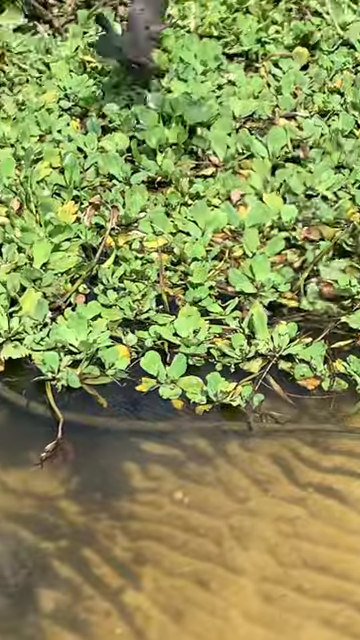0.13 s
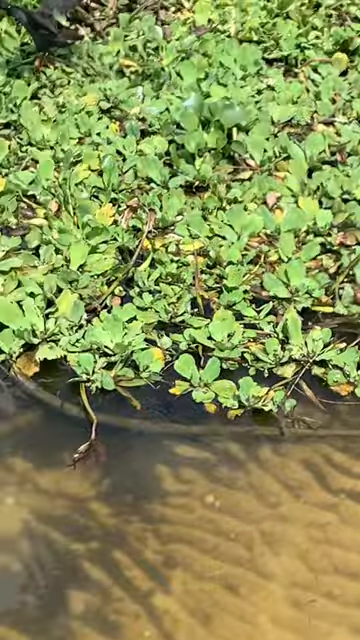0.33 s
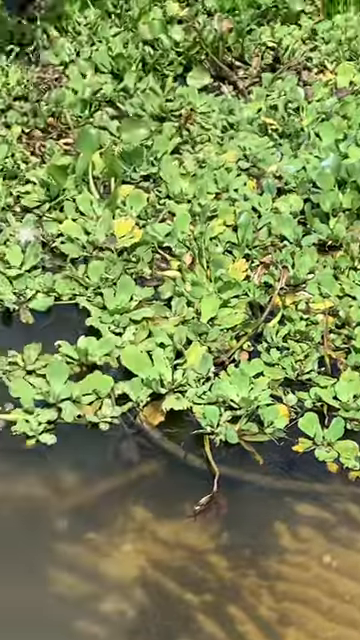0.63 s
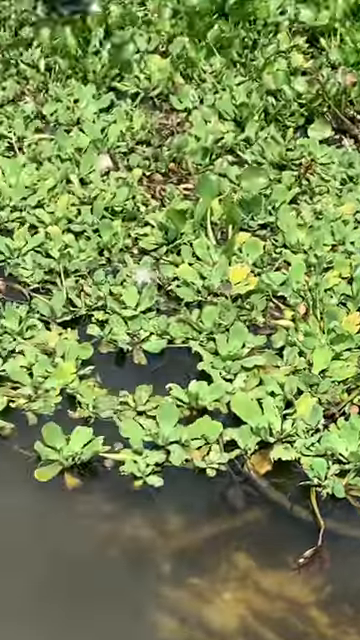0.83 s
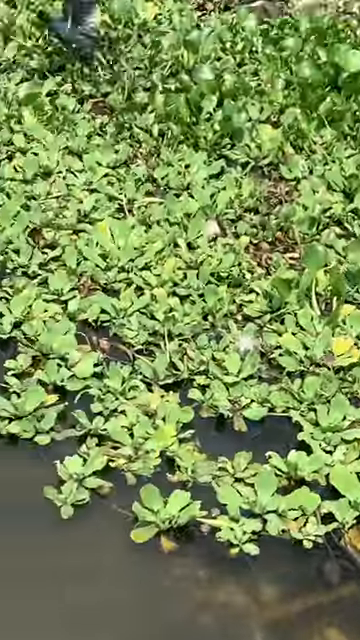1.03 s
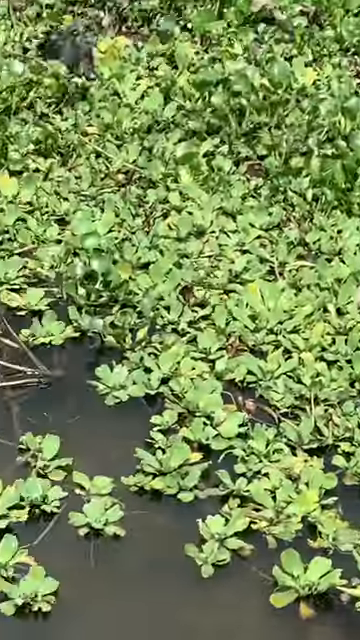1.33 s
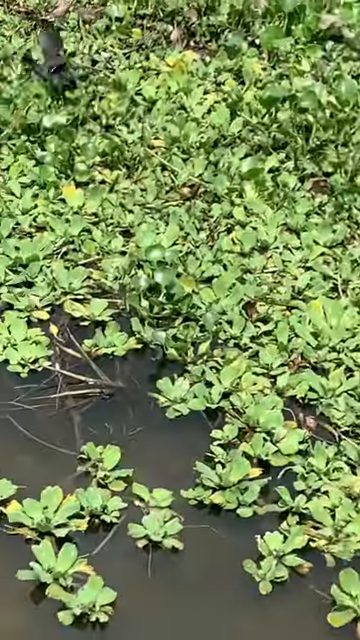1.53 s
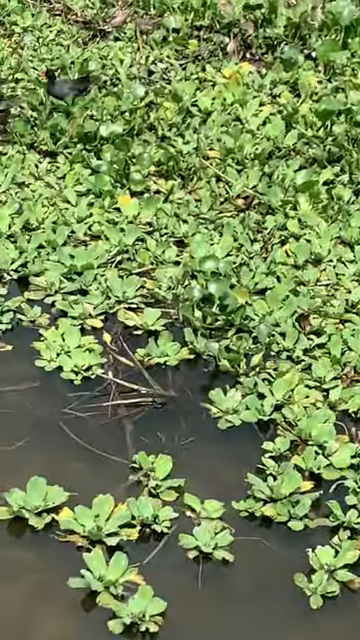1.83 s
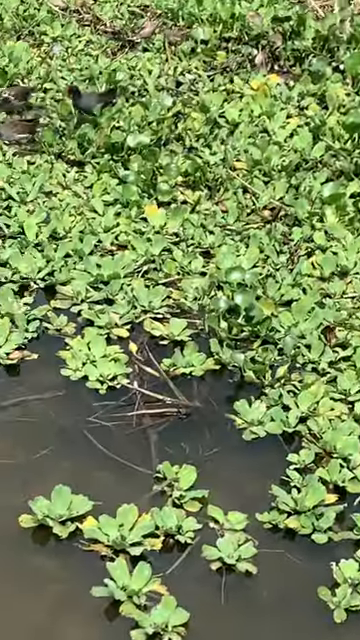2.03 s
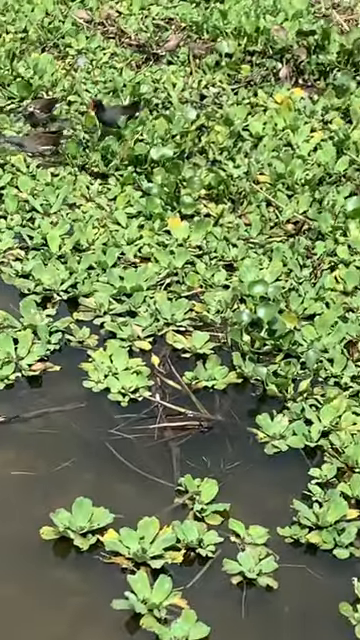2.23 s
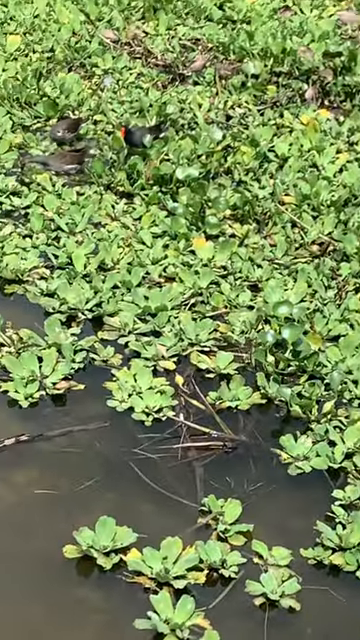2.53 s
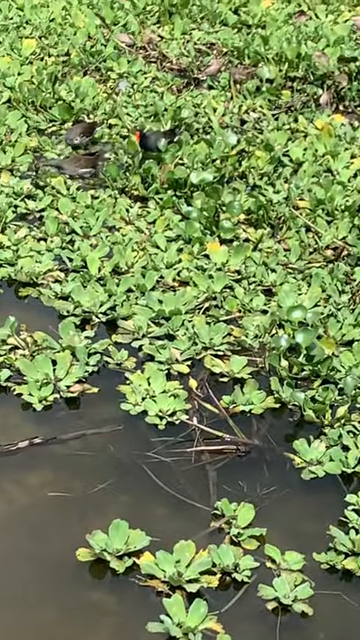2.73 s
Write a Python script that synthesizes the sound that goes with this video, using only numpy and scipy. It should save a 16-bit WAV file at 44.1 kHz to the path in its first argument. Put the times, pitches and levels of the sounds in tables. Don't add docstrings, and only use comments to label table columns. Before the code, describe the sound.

A moorhen close by gives two sharp clucks, then weaker ones, a grunt and a stuttered croak; wings brush floating leaves and stems snap, while a heavy vehicle rumbles low and wide behind the outdoor pond.

```python
import sys
import numpy as np
from scipy import signal
from scipy.fft import rfft, irfft, next_fast_len
from scipy.io import wavfile
from scipy.ndimage import uniform_filter1d, map_coordinates

SR = 44100
rng = np.random.default_rng(int(sys.argv[2]) if len(sys.argv) > 2 else 0)


def linear_from_db(decibels):
    return 10 ** (np.asarray(decibels, float) / 20)


def transcribe(signal):
    frames = np.atleast_2d(signal).T
    limited = np.clip(frames, -1, 1)
    pcm = np.round(limited * 32767).astype(np.int16)
    wavfile.write(sys.argv[1], SR, pcm)


N = 127890

# start_s, length_s, level_db, pitch_hz, share of pitch lost
FLYING_CLUCKS = [
    (0.085, 0.04, -19.5, 784, 0.33),
    (0.262, 0.04, -19, 767.4, 0.47),
]
TIRING_CLUCKS = [
    (.474, 0.038, -25, 712, 0.13),
    (.71, 0.055, -27.5, 724, 0.23),
    (1.189, 0.023, -32.5, 653, 0.1),
]
LANDED_CLUCKS = [
    (0.925, 0.051, -31.5, 715.6, .13),
    (1.417, 0.063, -27, 754.5, 0.19),
]
PIPS = [
    (.119, .01, -31, 770, 0),
    (.297, .011, -28, 790, 0),
    (.763, .011, -37, 700, 0),
    (1.18, .006, -40, 760, 0),
    (.675, .009, -37, 480, -.2),
    (.444, .005, -42, 620, 0),
    (.768, .016, -42, 640, -.1),
    (.512, .012, -39, 600, .05),
]
GRUNTS = [
    (1.864, 0.031, -31, 725, -0.058),
    (1.895, 0.013, -38, 620, -0.00072),
]
CROAKS = [(2.238, .02, -36, 1060, .04), (2.571, .005, -46, 660, 0), (2.58, .005, -43, 660, 0),
          (2.589, .007, -34, 660, 0), (2.599, .011, -32, 670, 0), (2.612, .011, -32, 670, 0),
          (2.627, .01, -33, 660, 0), (2.712, .005, -35, 720, 0), (2.72, .007, -41, 720, 0),
          (2.73, .006, -41, 720, 0), (2.738, .01, -32, 740, 0), (2.749, .01, -31, 730, 0),
          (2.759, .02, -28, 705, -.1), (2.78, .01, -30, 760, 0)]

# pitch_hz, level_db
NARROW_THROAT = [(750, -22.5), (1450, 0), (2250, -27.5), (3000, -23.5), (3900, -34.5), (7000, -51),
                 (14000, -59.5)]
HALF_OPEN_THROAT = [(700, -18.5), (1350, 3), (2150, -13), (2850, -12), (3600, -21), (4400, -27.5),
                    (7000, -42), (14000, -48.5)]
OPEN_THROAT = [(700, -10), (1400, 0.5), (2200, 0), (2900, -12), (3700, -7.5), (4400, -11.5), (6500, -30),
               (14000, -29.5)]
WIDE_THROAT = [(730, 5), (1400, -3), (2000, -14.5), (3000, 4.5), (3900, 7.5), (4700, 0.5), (6500, -16.5),
               (14000, -27)]
ROUND_THROAT = [(730, -2.5), (1500, -12), (2200, -2.5), (2950, 2), (3700, -3.5), (4400, -5), (5300, -17.5),
                (14000, -30.5)]
# pitch_hz, level_db per Hz
RASP = [(900, -17.5), (1300, -13), (1600, -8), (2000, -24.5), (4000, -23.5)]
# pitch_hz, level_db per Hz
HISS = [(600, -12.5), (1500, -8.5), (2700, -0.5), (3800, 1), (6000, -14)]

# centre_s, half_length_s, level_db
FLAPS = [(0.109, 0.074, -59), (0.286, 0.065, -44), (0.474, 0.087, -55.5), (0.747, 0.071, -46.5),
         (0.974, 0.094, -65.5), (1.142, 0.059, -53), (1.287, 0.22, -60), (1.442, 0.073, -51.5),
         (1.868, 0.052, -59), (2.6, 0.04, -55.5), (2.752, 0.052, -58)]
# pitch_hz, level_db per Hz
FEATHERS = [(1500, -8), (3800, 0), (5500, -4), (7800, 0), (16000, -8)]
# start_s, peak_db
SNAPS = [
    (0.444, -28),
    (0.651, -43.5),
    (1.0891, -23.5),
    (1.1277, -13.5),
    (1.53, -43),
    (2.051, -52.5),
]
# pitch_hz, level_db per Hz
STEM = [(1500, -11), (5000, -2), (8000, -10), (12500, -3), (16500, -7.5)]

# time_s, pitch_hz, level_db, octave_db
CHICK = [
    (2.138, 4000, -64, -85),
    (2.158, 4150, -59, -85),
    (2.165, 4700, -76, -76),
    (2.177, 5200, -58, -65),
    (2.195, 5900, -78, -67),
    (2.21, 6350, -67, -76),
    (2.226, 6300, -70, -90),
    (2.229, 5000, -70, -90),
    (2.238, 2700, -50, -90),
]
# start_s, end_s, level_db
TRILLS = [
    (.19, .345, -53),
    (.672, .689, -54),
    (.745, .81, -50),
    (1.115, 1.13, -47),
    (1.205, 1.41, -54),
]

# time_s, firing_hz, first_order_db, second_order_db
FIRING = [
    (.04, 56.33, -31.5, -28),
    (.5, 62.67, -31, -34),
    (1.05, 70.64, -28.5, -32),
    (1.55, 69.67, -29, -37.5),
    (2, 73.16, -25, -29.5),
    (2.4, 74.17, -28.5, -28.5),
    (2.9, 76.04, -27, -27),
]
# multiple of firing rate, level_db against the second order, unsteadiness_db
ORDERS = [(1.6, -6.5, -1), (3, -9.5, 4), (4, -18.5, 5.5)]
# pitch_hz, level_db per Hz
RUMBLE = [(30, -38.5), (50, 0), (90, -5.5), (125, 2), (190, -5), (250, -18), (320, -17.5), (450, -26.5)]
# pitch_hz, level_db per Hz
ROAD = [(300, 1), (500, 1), (800, 0.5), (1100, -7.5), (2200, -17.5), (4000, -19.5), (7000, -37.5),
        (16000, -44.5)]
# pitch_hz, level_db per Hz
BUZZ = [(14800, -2), (15500, -7.5), (15900, -10)]

# pitch_hz, lead_radians
LEAD = [(40, 0.2), (300, -0.9), (650, -1.73), (1000, -1.5), (1300, 0.64), (2300, 0.77), (3000, 1.45),
        (3900, 2.32)]
# pitch_hz, left_over_right_db
LEFT_DB = [(40, 0), (220, 4.5), (450, 3.5), (600, 0), (2000, -4.5), (3300, -1.5)]
# pitch_hz, unrelated share
LOOSE = [(60, .08), (250, 0.094), (500, 0.23), (1500, 0.67), (3500, 0.4), (4200, 0.028), (16000, 0.03)]

RUMBLE_DB, ROAD_DB = -28.5, -44
LEAD_TOP_HZ = 3900
TOP_HZ = 15950
T = np.arange(N) / SR


def unit(x):
    return x / np.sqrt(np.mean(x ** 2) + 1e-20)


def along(points, hz):
    f, v = np.transpose(points)
    return np.interp(np.log(hz + 1), np.log(f + 1), v)


def curves(rows):
    s, *cols = np.transpose(rows)
    return [np.interp(T, s, c) for c in cols]


def wobble(rate_hz):
    return map_coordinates(rng.standard_normal(int(N * rate_hz / SR) + 4), [np.arange(N) * rate_hz / SR])


def filtered(x, response):
    m = next_fast_len(N + 8192)
    return irfft(rfft(x, m) * response(np.fft.rfftfreq(m, 1 / SR)), m)[..., :N]


def noise(spectrum):
    closed = [(spectrum[0][0] / 2, -90), *spectrum, (spectrum[-1][0] * 2, -90)]
    return unit(filtered(rng.standard_normal(N), lambda hz: linear_from_db(along(closed, hz))))


def voice(calls, throat, attack_s, release, bend, rough, flutter_db):
    out, breath = np.zeros(N), noise(throat)
    shake, blur = wobble(250), wobble(500)
    k = np.arange(1, 23)[:, None]
    wander = 0.025 * np.clip(k - 3, 1, 8)
    for start_s, length_s, db, hz, sag in calls:
        i = round(start_s * SR) + np.arange(round(length_s * SR))
        u = np.linspace(0, 1, len(i))
        pitch = hz * (1 - sag * u ** bend) * (1 + 0.07 * rough * shake[i])
        turn = 2 * np.pi * np.cumsum(pitch) / SR
        overtone_hz = k * pitch

        knots = rng.standard_normal((len(k), 8))
        flutter = np.array([np.interp(u * length_s * 110, np.arange(8), row) for row in knots])
        flutter = flutter * np.clip((k - 1.5) / 1.5, .3, 3)
        beak_db = 11 * np.exp(-((overtone_hz - 9470) / 1700) ** 2)
        tired_db = 3 * np.clip(k - 2, 0, 5) * u ** 2 * abs(sag) / 0.24
        level_db = along(throat, overtone_hz) + beak_db - tired_db + flutter_db * flutter

        waves = np.sin(k * (turn + wander * blur[i]) + knots[:, -1:])
        stack = unit((linear_from_db(level_db) * (overtone_hz < TOP_HZ) * waves).sum(0))
        attack = np.clip(u * length_s / attack_s, 0, 1)
        shape = attack * np.clip((1 - u) / release, 0, 1) * linear_from_db(-4.5 * u)
        out[i] += linear_from_db(db) * shape * (stack + rough * breath[i] * (1 + np.cos(turn)))
    return out


def moorhen_breath():
    wrap = np.zeros(N)
    for start_s, length_s, db, _, _ in FLYING_CLUCKS + TIRING_CLUCKS + LANDED_CLUCKS:
        before = np.exp(-((start_s - T) / .03) ** 2)
        after = np.exp(-((T - start_s - length_s) / .012) ** 2)
        wrap += linear_from_db(db) * (before + after)
    rasp = linear_from_db(-19.5 + 2.5 * wobble(90)) * wrap * noise(RASP)
    gate = np.clip((T - 1.823) / 0.015, 0, 1) * (T < GRUNTS[1][0])
    return rasp + linear_from_db(-46 + 1.6 * wobble(130)) * gate * noise(HISS)


def moorhens():
    flying = voice(FLYING_CLUCKS, NARROW_THROAT, .0053, .14, 5.5, .06, flutter_db=2)
    tiring = voice(TIRING_CLUCKS, HALF_OPEN_THROAT, .0032, .14, 3.4, .06, flutter_db=2)
    landed = voice(LANDED_CLUCKS, OPEN_THROAT, .0033, .14, 1.6, .06, flutter_db=2)
    pips = voice(PIPS, NARROW_THROAT, 0.00091, 0.22, 0.53, 0.41, flutter_db=5.5)
    croaks = linear_from_db(1.5) * voice(CROAKS, WIDE_THROAT, 0.0022, 0.29, 1.0, 0.4, flutter_db=-0.5)
    grunts = voice(GRUNTS, ROUND_THROAT, .003, 0.22, 1.4, 0.29, flutter_db=1.2)
    return flying + tiring + landed + pips + croaks + grunts + moorhen_breath()


def leaves():
    swell = sum(linear_from_db(db) * np.exp(-((T - s) / half_s) ** 2) for s, half_s, db in FLAPS)
    snaps = np.zeros(N)
    for start_s, peak_db in SNAPS:
        fade_db = 60 * np.maximum(T - start_s, 0) / 0.0093
        snaps += linear_from_db(peak_db - fade_db) * np.clip((T - start_s) / 0.00041, 0, 1)
    return swell * linear_from_db(1.53 * wobble(120)) * noise(FEATHERS) + 0.44 * snaps * noise(STEM)


def chick():
    pitch, level_db, octave_db = curves(CHICK)
    turn = 2 * np.pi * np.cumsum(pitch) / SR
    on = (T > CHICK[0][0]) & (T < CHICK[-1][0])
    note = linear_from_db(level_db + 4 * wobble(120)) * np.sin(turn)
    octave = linear_from_db(octave_db + 4 * wobble(120)) * np.sin(2 * turn)
    return on * (note + octave)


def insect():
    pulse_hz, pitch_hz, sweep_hz, sharpness = 57, 3950, 850, .3
    level, pulses = np.zeros(N), np.zeros(N)
    for start_s, end_s, db in TRILLS:
        on = linear_from_db(db) * ((T > start_s) & (T < end_s))
        level += on
        pulses += on * np.sin(np.pi * pulse_hz * (T - start_s)) ** 2
    stroke = pulses / (level + 1e-9)
    pitch = pitch_hz + 120 * wobble(400) - sweep_hz * (1 - stroke)
    tone = np.sin(2 * np.pi * np.cumsum(pitch) / SR)
    return 1.93 * pulses * stroke ** sharpness * linear_from_db(5.9 * wobble(80)) * tone


def patchy(x, patchy_db):
    z = signal.stft(x, nperseg=512)[2]
    field = uniform_filter1d(rng.standard_normal(z.shape), size=8, axis=0)
    field = uniform_filter1d(field, size=10, axis=1)
    return signal.istft(z * linear_from_db(patchy_db * unit(field)), nperseg=512)[1][:N]


def vehicle():
    rate, first_db, second_db = curves(FIRING)
    usual_db = second_db.mean()
    turn = 2 * np.pi * np.cumsum(rate) / SR
    orders = [(1, first_db, 1.46), (2, second_db, 3.43)]
    orders += [(k, usual_db + db, swing_db) for k, db, swing_db in ORDERS]
    engine = np.zeros(N)
    for k, db, swing_db in orders:
        engine += linear_from_db(db + 2.5 + swing_db * wobble(14)) * np.sin(k * turn + 0.5 * k * wobble(12))
    boom = linear_from_db(-37 + 1.33 * wobble(12)) * np.sin(2 * np.pi * 118.2 * T + 0.61 * wobble(9))
    rumble = linear_from_db(RUMBLE_DB + 2.06 * wobble(6.196)) * noise(RUMBLE)
    tyres = linear_from_db(ROAD_DB + 0.14 * wobble(5.3)) * patchy(noise(ROAD), patchy_db=2.5)
    buzz_level = linear_from_db(-80.5 + 1.6 * (second_db - usual_db) + 3 * wobble(3))
    buzz = buzz_level * (1.3 + np.cos(turn)) ** 1.5 * noise(BUZZ)
    return engine + boom + rumble + tyres + buzz


def two_sides(x, loose, lean):
    def half(hz):
        lead = along(LEAD, hz) + 2 * np.pi * 0.00023 * np.maximum(hz - LEAD_TOP_HZ, 0)
        for share in (.9, .45):
            pull = share * np.clip(hz / LEAD_TOP_HZ - 1, 0, .1) * 5
            lead = lead - pull * np.sin(2 * lead)
        return linear_from_db(along(LEFT_DB, hz) / 2 * (hz < LEAD_TOP_HZ)) * np.exp(.5j * lead)

    def pair(hz):
        return np.array([half(hz), 1 / half(hz)])

    def wide_pair(hz):
        return pair(hz) * along(LOOSE, hz) * [[1], [-1]]

    return filtered(x + lean * [[1], [-1]], pair) + filtered(loose, wide_pair)


def scene():
    birds = moorhens()
    near = birds + leaves() + chick() + insect()
    wide = linear_from_db(RUMBLE_DB) * noise(RUMBLE) + linear_from_db(ROAD_DB) * noise(ROAD)
    left = linear_from_db(2.5)
    lean = filtered(birds, lambda hz: (hz < LEAD_TOP_HZ) * (left - 1) / (left + 1))
    lean = lean + filtered(birds, lambda hz: (hz >= LEAD_TOP_HZ) * .3 * np.exp(-2j * np.pi * hz * .0021))
    return two_sides(near + vehicle(), wide, lean)


def top_cut(x):
    return signal.sosfilt(signal.butter(12, 16400, fs=SR, output="sos"), x)


def record(dry):
    mix = filtered(dry, lambda hz: hz < TOP_HZ)
    mix = mix * (np.arange(N) >= 1600)
    return top_cut(mix)


dry = scene()
out = record(dry)
transcribe(out)
```